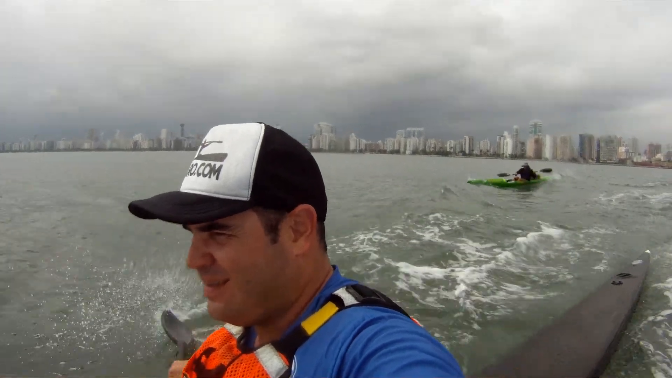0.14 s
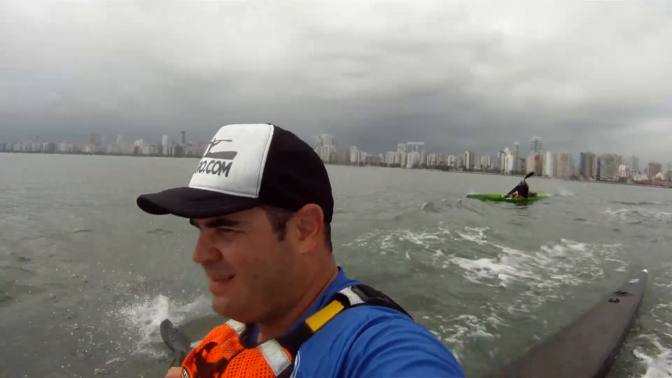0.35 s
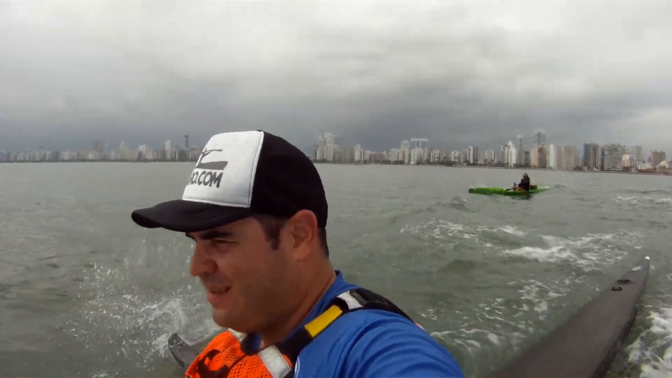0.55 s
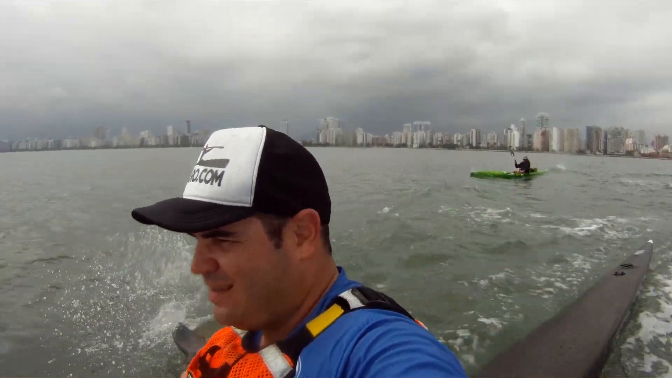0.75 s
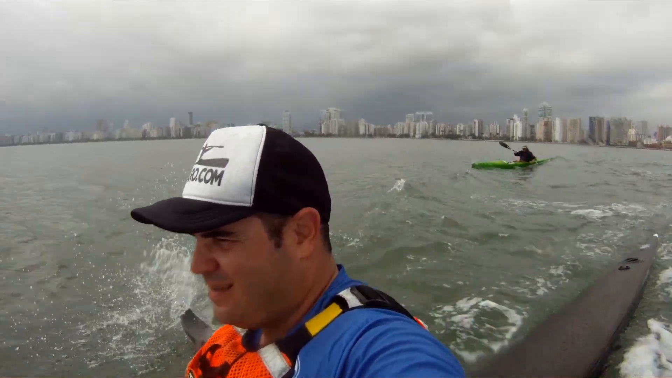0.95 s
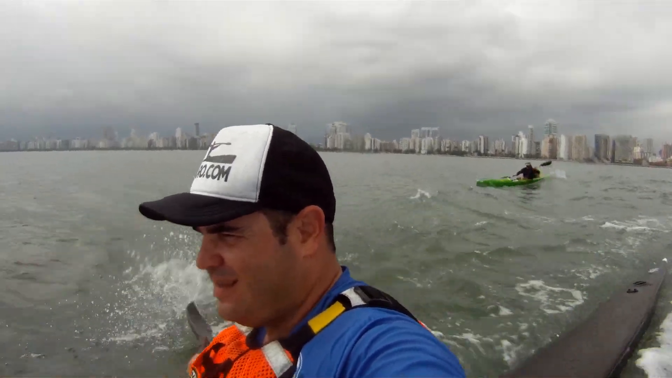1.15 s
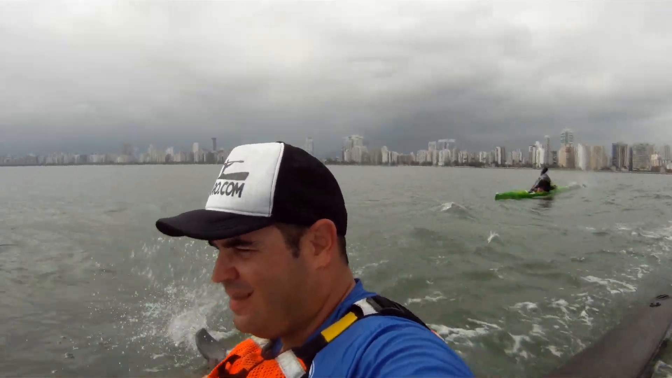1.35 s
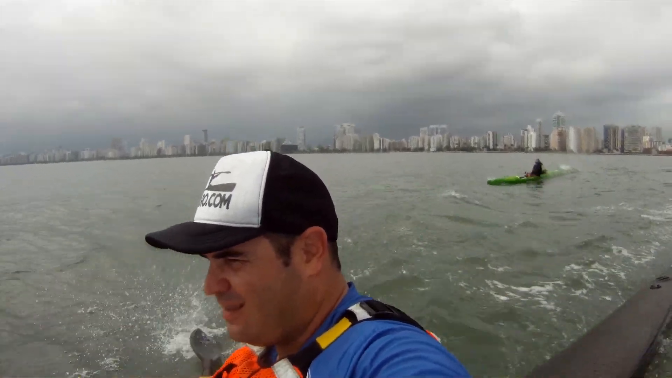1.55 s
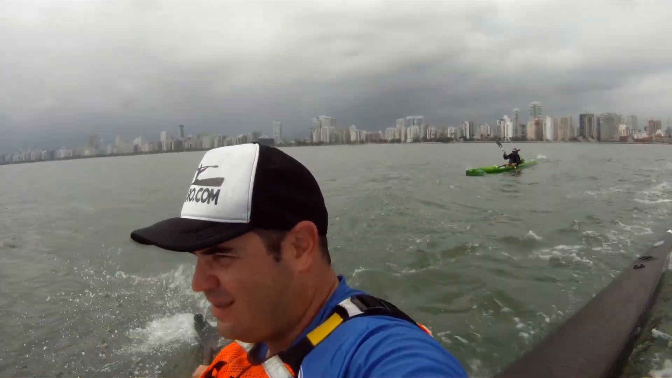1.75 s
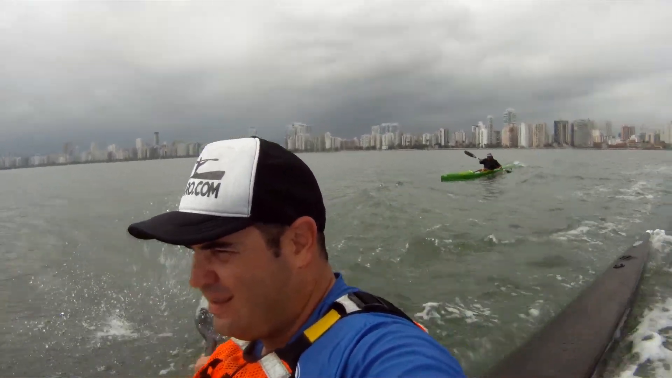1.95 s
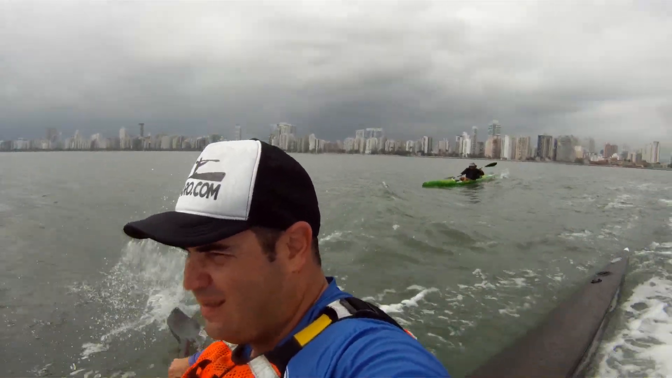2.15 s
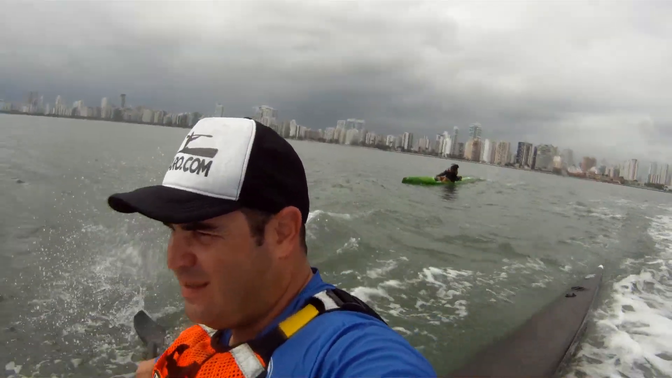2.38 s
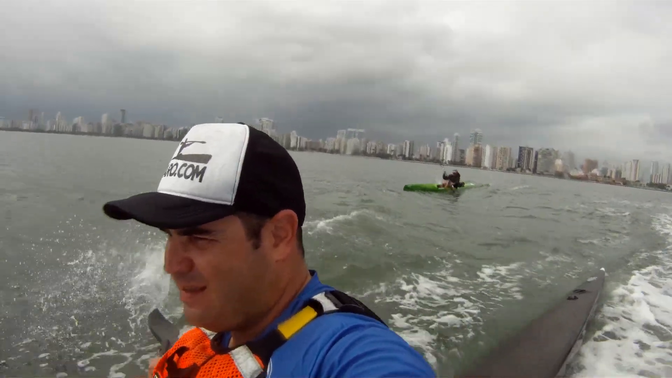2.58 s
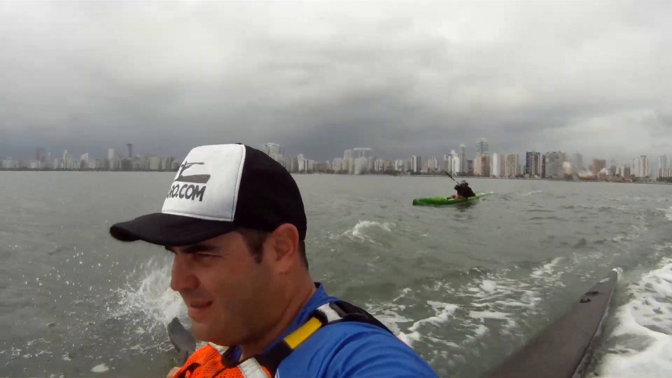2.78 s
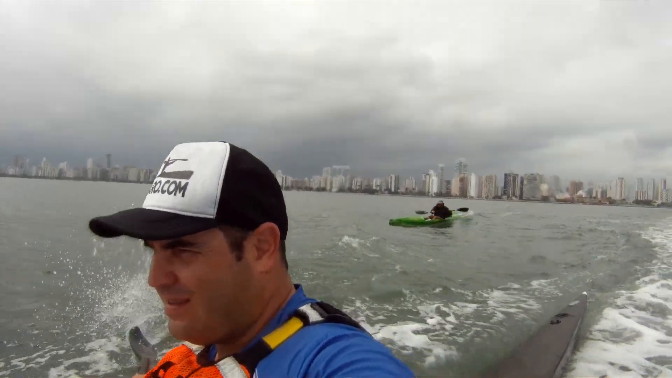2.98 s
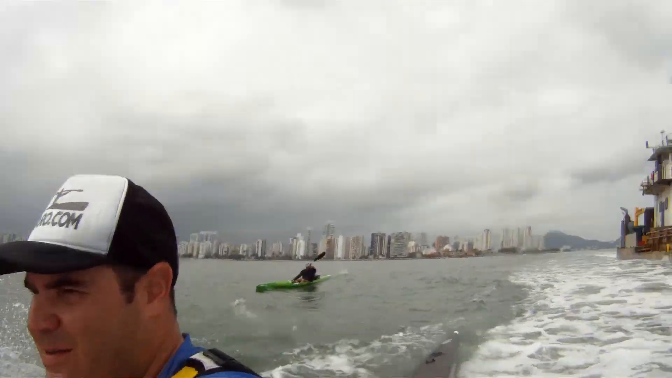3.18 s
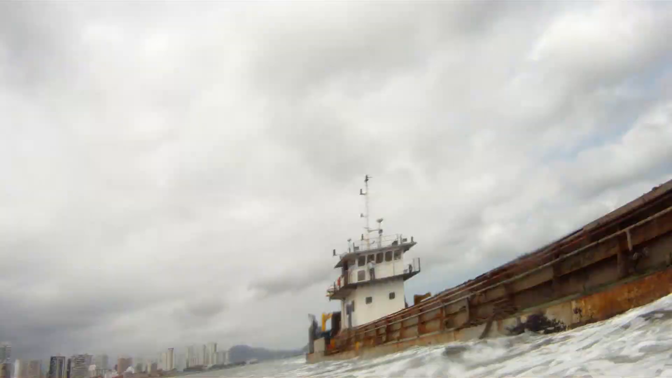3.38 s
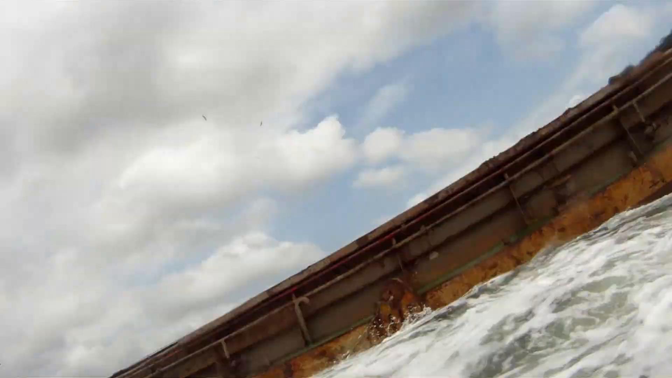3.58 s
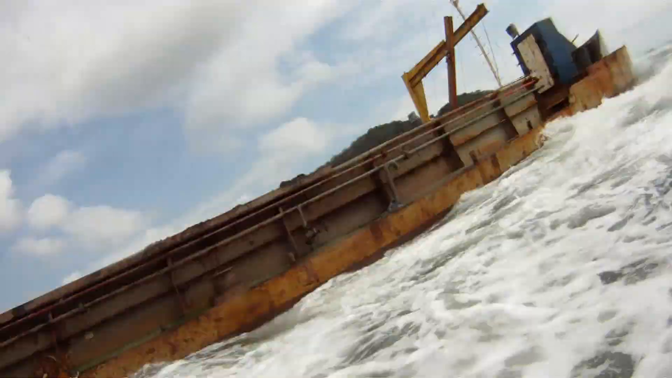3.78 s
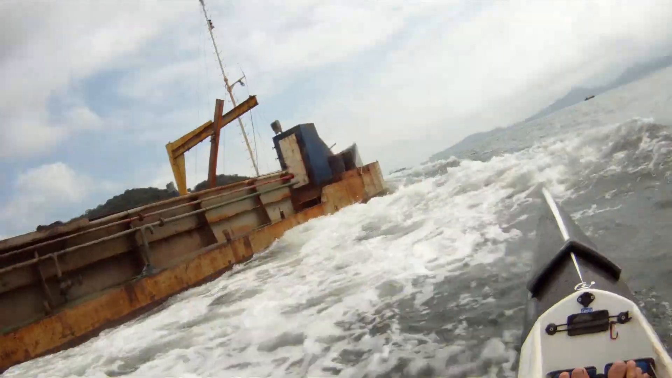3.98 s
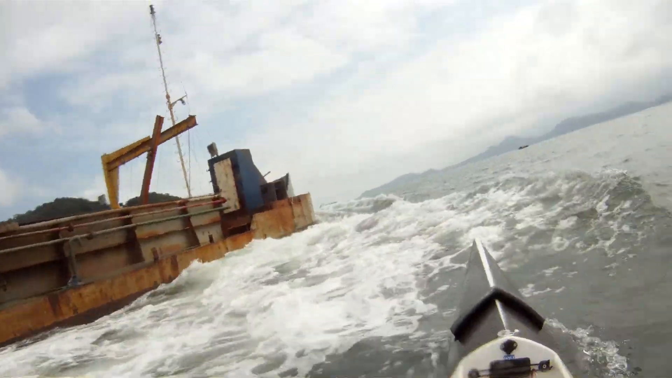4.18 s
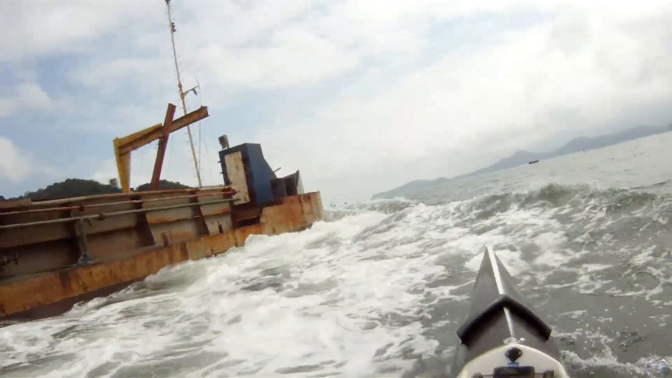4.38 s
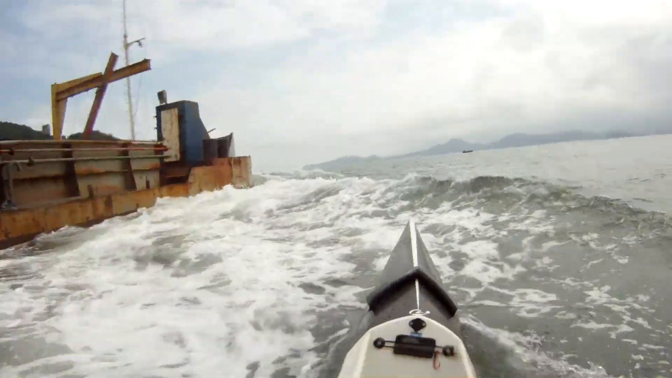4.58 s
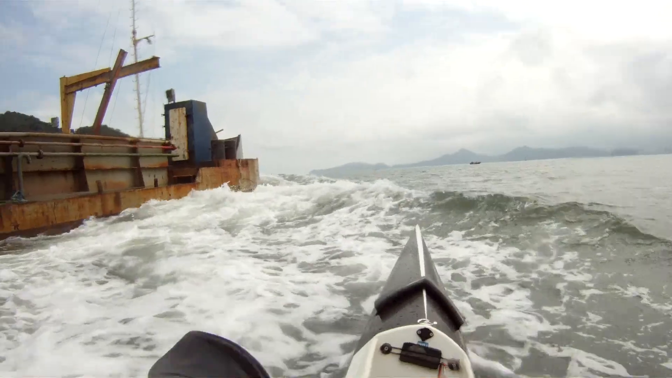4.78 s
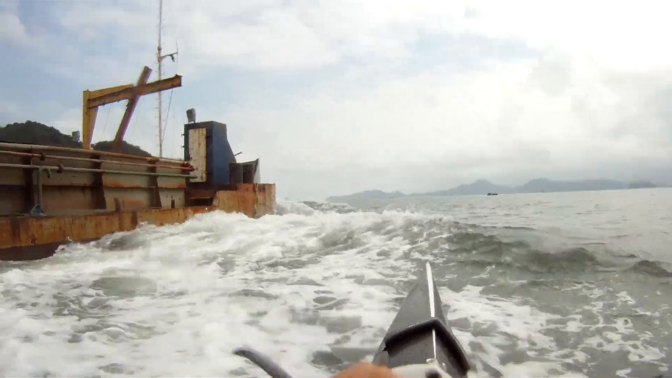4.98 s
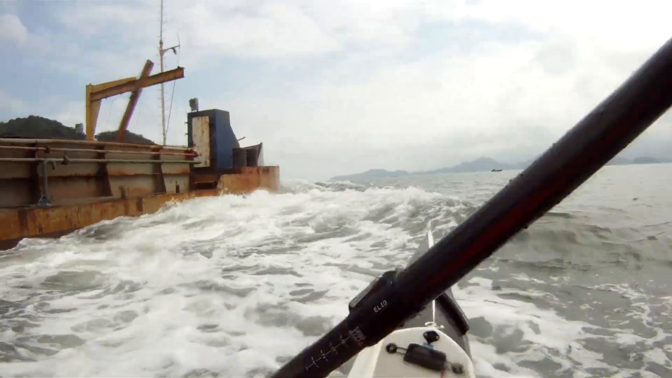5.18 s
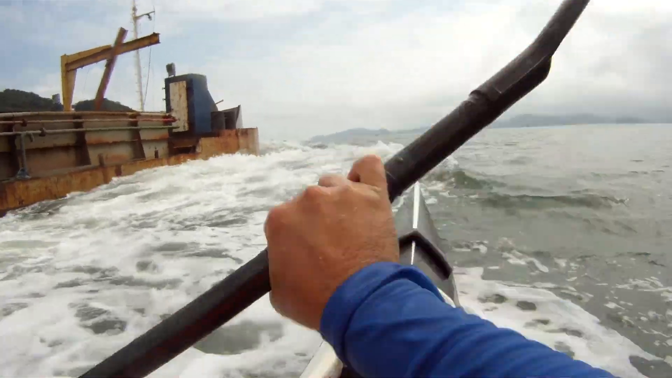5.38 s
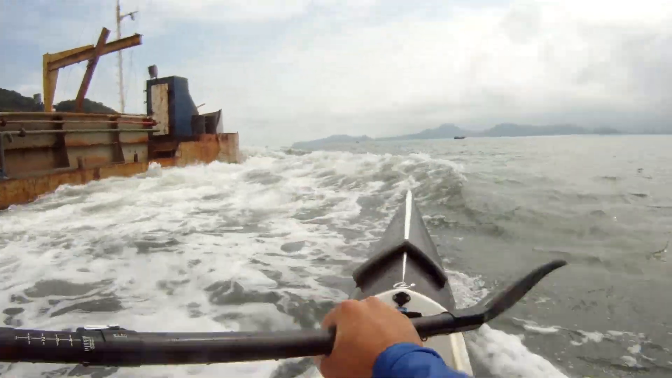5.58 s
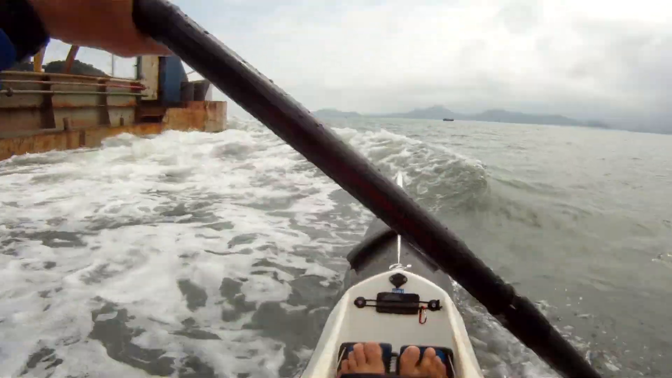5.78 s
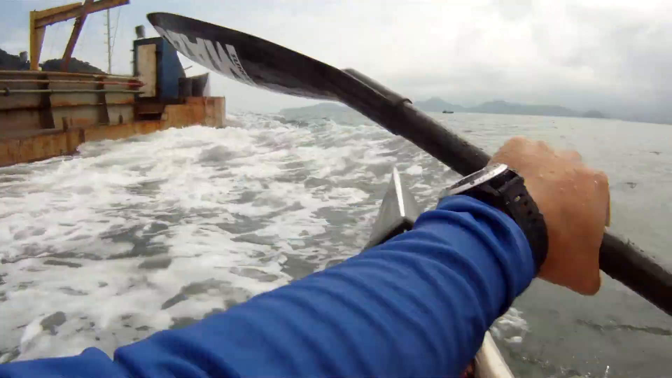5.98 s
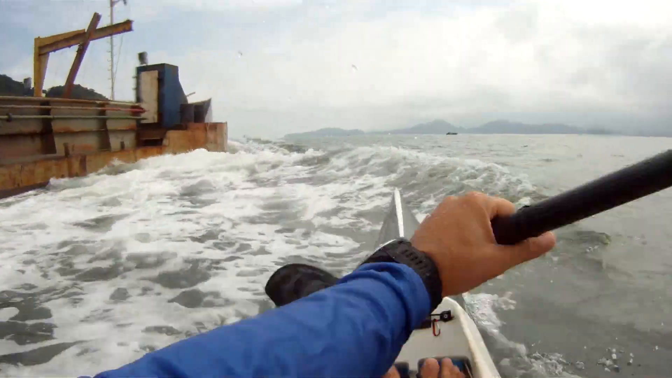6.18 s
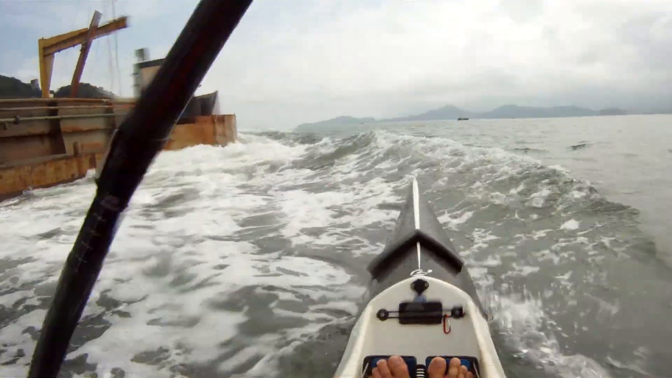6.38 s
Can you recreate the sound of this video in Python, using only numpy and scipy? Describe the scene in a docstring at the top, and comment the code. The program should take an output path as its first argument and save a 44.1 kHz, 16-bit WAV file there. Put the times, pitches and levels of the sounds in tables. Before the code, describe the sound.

Choppy sea washes, bubbles and fizzes steadily past a kayak, heard from inside a waterproof housing. Underneath are a low hull rumble and the hum of a nearby boat engine, which dips briefly around 1.7 seconds. Small paddle splashes and single bubble plops dot the first three seconds. At about 3.3 seconds the wake hisses up and the housing starts turning on its mount: several loud, close knocks, then a short falling squeak at 3.6. From 4 to 4.8 seconds comes a dense run of knocks, wet plastic rubs and dull thumps, with another squeak and low wind buffeting, loudest between 4.2 and 4.5. Faint ticks die away by 5.1 seconds. The water now sounds fuller and lower, with foam swelling over the engine hum. A few splashes, plops and one light knock come shortly before the end at 6.4 seconds.

```python
"""Choppy sea, in a kayak paddled through the foaming wake of a cargo boat whose engine drones nearby.
Chop and wind rumble; bubbles wash and fizz past the hull; drops splash off the blade.
All is heard from inside a waterproof camera housing, which rubs, thumps and knocks as it is swung
on its mount from stern to bow. The water changes colour with the turn."""
import sys
import numpy as np
from scipy import signal
from scipy.fft import rfft, irfft, next_fast_len
from scipy.io import wavfile

SR = 44100
rng = np.random.default_rng(int(sys.argv[2]) if len(sys.argv) > 2 else 0)


def file_out(sig):
    """Save sig as 16-bit WAV at sys.argv[1]."""
    # one column per channel
    cols = np.atleast_2d(sig).T
    # limit, then scale
    lim = np.clip(cols, -1, 1)
    pcm = np.round(lim * 32767).astype(np.int16)
    wavfile.write(sys.argv[1], SR, pcm)


N = 284004
TIME_S = np.arange(N) / SR

# swing of the camera, 0 = stern, 1 = bow: time_s, bow_share
FACING = [(3.3, 0.08), (4.3, 0.68)]
# head wind on the housing: time_s, level_db
WIND_LEVEL = [(0, -63), (2.6, -48), (3.3, -49), (3.7, -35), (4.0, -44), (4.45, -32), (4.75, -42.5),
              (5.3, -41), (6.44, -44)]
# spectra of wind and hull rumble: freq_hz, density_db
WIND_COLOUR = [(8, -7.5), (13, 11), (22, -17), (40, -14), (80, -58), (200, -59)]
HULL_COLOUR = [(12, -23), (25, -13), (45, 9), (70, 1.5), (120, 3.5), (170, -4.5), (240, -12), (400, -14),
               (800, -28)]
# engine firing tone: time_s, level_db
ENGINE_LEVEL = [(0, -39), (0.7, -41.5), (1.7, -54), (2.0, -42.5), (3.15, -38), (5.05, -48), (5.4, -41.5),
                (6.44, -40.5)]
# engine firing rate: time_s, rate_hz
ENGINE_RATE = [(0, 81.17), (3.2, 82.1), (4.0, 80.27), (6.44, 80.4)]
# wake hiss as the camera sweeps past: crest_s, half_length_s, level_db
WAKE_SWELLS = [(3.29, 0.065, -49), (3.58, 0.13, -48.5), (3.93, 0.029, -50), (4.02, 0.022, -42)]
# wake spectrum: freq_hz, density_db
WAKE_COLOUR = [(1500, -10), (2100, -6), (2500, 12.5), (3100, -1.5), (3700, -9), (4700, 3.5), (5800, -5)]
# water spectra facing the stern: freq_hz, density_db
WASH_STERN = [(120, -8), (200, 2), (330, -7.5), (550, -7.5), (760, -0.5), (1000, 5.5), (1200, 1.5),
              (1450, -13.5), (2500, -20)]
SPRAY_STERN = [(250, -6), (600, -19), (1350, -17), (1680, -3.5), (1900, -9.5), (2330, 0.5), (2600, -7),
               (3000, -14.5), (3800, -11.5), (5500, -28)]
FIZZ_STERN = [(2200, 7.5), (2900, -10), (3200, -16), (3600, 6), (4000, -21), (4450, -19), (5100, 0),
              (5600, -2.5), (6000, -17)]
# water spectra facing the bow: freq_hz, density_db
WASH_BOW = [(120, -27), (200, 13), (330, 5), (480, -5), (760, -7.5), (1050, -5), (1400, 1.5), (2500, -5)]
SPRAY_BOW = [(250, -3), (600, -4), (1400, -29), (1750, -4.5), (2200, 2.5), (2500, -2), (3000, -13),
             (3800, -47), (5500, -47)]
FIZZ_BOW = [(2200, -16), (3000, -12), (3500, 2.5), (3800, 2), (4200, 1.5), (4650, -9.5), (5100, -10.5),
            (5600, -13), (6000, -28)]
# waves along the hull, foam patches: crest_s, half_length_s, level_db
WAVE_SWELLS = [(0.2, 0.38, -57.5), (1.03, 0.045, -53), (1.38, 0.34, -52.5), (2.17, 0.18, -50.5),
               (2.82, 0.11, -53), (3.2, 0.26, -54), (4.4, 0.46, -50)]
FOAM_SWELLS = [(0.8, 0.35, -60.5), (1.5, 0.13, -57), (3.45, 0.17, -54), (4.7, 0.21, -62),
               (5.06, 0.19, -52.5), (5.85, 0.074, -52.5), (6.37, 0.1, -50)]
# splashes off blade and bow: start_s, length_s, level_db, pitch_hz
SPLASHES = [(0.443, 0.042, -46, 2450), (0.765, 0.063, -45, 2380), (1.394, 0.024, -41, 2410),
            (1.52, 0.051, -44, 2500), (1.689, 0.012, -35, 2120), (2.046, 0.046, -42.5, 1000),
            (2.153, 0.0031, -36.5, 2380), (3.034, 0.011, -42.5, 2290), (3.372, 0.017, -35, 2320),
            (3.567, 0.015, -33, 2550), (3.654, 0.074, -37.5, 2550), (3.714, 0.046, -38.5, 2280),
            (4.348, 0.012, -37.5, 2520), (4.881, 0.0154, -32, 2150), (4.913, 0.013, -39, 2250),
            (5.116, 0.013, -39.5, 2720), (5.822, 0.072, -48.5, 2200), (6.308, 0.039, -37, 2300),
            (6.367, 0.038, -40.5, 2280)]
# single close bubbles: start_s, peak_db, pitch_hz
PLOPS = [(0.625, -32.5, 2320), (2.257, -36.5, 2390), (5.842, -38.5, 3630), (6.381, -31, 4200)]
# rubs on the housing: start_s, length_s, level_db
RUBS = [(3.669, 0.051, -48), (3.719, 0.053, -35), (4.06, 0.12, -35), (4.212, 0.045, -29.5),
        (4.346, 0.056, -38.5), (4.42, 0.027, -34.5), (4.438, 0.023, -19), (4.452, 0.065, -25),
        (4.718, 0.015, -34.5), (4.748, 0.022, -40), (4.801, 0.04, -36), (4.942, 0.043, -53)]
# rub spectrum: freq_hz, density_db
RUB_COLOUR = [(100, 7), (300, 0), (550, -5.5), (900, 4), (1400, -8.5), (2050, -4), (2500, -10), (3000, -29),
              (3600, -20), (5000, -35)]
# pressure pulses of the flexing housing: centre_s, peak_db, width_ms, edge_ms
THUMPS = [(3.8432, -29, 2.8, 2.2), (4.0208, -22.5, 1.6, 2.6), (4.1143, -15.5, 1.64, 1.8),
          (4.1327, -18, 14, 0.92), (4.246, -22, 5.7, 3.1), (4.441, -11.5, 3, 3.1), (4.4534, -8.5, 2.6, 3.9),
          (4.477, -12.5, 3.9, 0.75), (4.5083, -16, 2.9, 2.6), (4.5615, -21.5, 2.7, 0.15),
          (4.6528, -19.5, 1.35, 0.56), (4.7, -18.5, 1.03, 0.78), (4.8299, -22.5, 3.2, 1)]
# knocks of the mount: start_s, main_db, swell_ms, main_hz, hardness_db
KNOCKS = [ (3.3117, -7, 0.89, 1110, -14.5), (3.3896, -2, 1.02, 1167, -27.5), (3.4474, -2, 1.0, 1148, -20),
          (3.4646, -5.5, 1.6, 1210, -14), (3.483, -5.5, 1.08, 1130, -4), (4.014, -28.5, 0.65, 1000, 16),
          (4.0814, -19.5, 1.5, 915, 21), (4.0852, -19.5, 1.05, 925, 20.5), (4.129, -23, 1.5, 1000, -14),
          (4.2538, 3.5, 1.67, 945, 18.5), (4.2642, -24, 0.91, 1040, 31), (4.287, -34, 0.87, 1090, 18),
          (4.3956, -23.5, 2.6, 800, -11), (4.4127, -10.5, 1.26, 1094, 4.5), (4.4735, -12, 1.26, 1024, -24),
          (4.4883, -12, 0.89, 950, -17), (4.4924, -23, 1.5, 920, 12.5), (4.5086, -6, 1.25, 1123, -13),
          (4.687, -37, 1.96, 1450, 23.5), (4.699, -27, 0.6, 860, 4.5), (4.763, -29.5, 1, 1000, 7),
          (4.772, -28, 0.57, 940, -4), (4.8157, -20.5, 0.85, 1000, 2), (4.943, -33, 1.5, 1120, 11),
          (6.268, -22.5, 0.48, 1110, 13.5)]
# longer slips, gliding down: start_s, main_db, swell_ms, main_hz, hardness_db, sag_share
SQUEAKS = [(3.5874, -5, 3.14, 1200, 6, 0.17), (4.1593, -6, 3.23, 1011, -11.5, 0.4)]
# upper housing modes, raised by hard contact: freq_hz, base_db, db_per_hardness_db
HIGHER_MODES = [(2024, -4.5, 0.427), (2475, -18, 0.45), (3560, -22.5, 1.1632)]
# thud spectrum of the whole case: freq_hz, density_db
THUD_COLOUR = [(50, -8), (110, 6.5), (170, -1.5), (250, -5.5), (330, 1), (450, -32.5), (650, -11),
               (1200, -23)]


def from_db(db):
    """Decibels to gain."""
    return 10 ** (np.asarray(db) / 20)


def unit_rms(x):
    """Scale to rms 1."""
    return x / np.sqrt(np.mean(x ** 2) + 1e-20)


def curve(rows):
    """Breakpoints interpolated to every sample."""
    return np.interp(TIME_S, *np.transpose(rows))


def add(track, start_s, sound):
    """Mix a short sound into a track."""
    start = int(round(start_s * SR))
    track[start:start + len(sound)] += sound[:N - start]


def drift(rate_hz, size=N):
    """Random wander of spread 1, rate_hz new values a second."""
    points = rng.standard_normal(size // 10)
    return np.interp(np.arange(size) * rate_hz / SR, np.arange(len(points)), points) / np.sqrt(2 / 3)


def coloured(x, colour):
    """Filter by a spectrum, rolling off past its ends; rms 1."""
    size = next_fast_len(len(x))
    freq_hz, density_db = np.transpose(colour)
    log_hz = np.log(np.arange(size // 2 + 1) * SR / size + 1)
    beyond = np.abs(log_hz - np.clip(log_hz, np.log(freq_hz[0]), np.log(freq_hz[-1])))
    gain = from_db(np.interp(log_hz, np.log(freq_hz), density_db) - 20 * beyond)
    return unit_rms(irfft(rfft(x, size) * gain, size)[:len(x)])


def grains(per_s, spread_db):
    """Random clicks of unequal size; rms 1."""
    sizes = from_db(spread_db * np.minimum(rng.exponential(1, N), 4)) * rng.choice([-1, 1], N)
    return unit_rms(sizes * (rng.random(N) < per_s / SR))


def burst(length_s):
    """Arched envelope with steep ends."""
    progress = np.linspace(0, 1, max(int(length_s * SR), 8))
    return np.sqrt(np.abs(np.sin(np.pi * progress)))


def swells(rows):
    """Gain of bell-shaped swells, summed in power."""
    bells = (from_db(level_db) * np.exp(-.5 * ((TIME_S - crest_s) / half_s) ** 2)
             for crest_s, half_s, level_db in rows)
    return np.sqrt(sum(bell ** 2 for bell in bells))


def facing_gain(stern_db, bow_db):
    """Gain that follows the camera's turn."""
    return from_db(stern_db + (bow_db - stern_db) * curve(FACING))


def rumble(hull_db, sway_db):
    """Chop drums on the hull; wind buffets the housing."""
    hull = from_db(hull_db + sway_db * drift(3.72)) * coloured(rng.standard_normal(N), HULL_COLOUR)
    wind = from_db(curve(WIND_LEVEL)) * coloured(rng.standard_normal(N), WIND_COLOUR)
    return hull + wind


def engine(octave_db, waver_db):
    """The exhaust's firing tone fades and returns; its weak octave stays."""
    phase = 2 * np.pi * np.cumsum(curve(ENGINE_RATE)) / SR
    octave = from_db(octave_db + 3.7 * drift(8)) * np.sin(2 * phase + .6 * drift(17))
    firing = from_db(curve(ENGINE_LEVEL) + waver_db * drift(17)) * np.sin(phase)
    return np.sqrt(2) * (firing + octave)


def wake():
    """Churned water hisses as tiny bubbles burst."""
    return swells(WAKE_SWELLS) * coloured(grains(per_s=15000, spread_db=8), WAKE_COLOUR)


def bubbles(low_hz, high_hz, per_s, ring_cycles, size_count=14):
    """Bubbles pinch off at random, each dying by 60 dB in ring_cycles; rms 1."""
    clicks = grains(per_s, spread_db=4.5)
    size_index = rng.integers(0, size_count, N)
    out = np.zeros(N)
    for k, pitch_hz in enumerate(np.geomspace(low_hz, high_hz, size_count)):
        step_rad = 2 * np.pi * pitch_hz / SR
        decay = from_db(-60 * pitch_hz / (ring_cycles * SR))
        resonator = [0, np.sin(step_rad)], [1, -2 * decay * np.cos(step_rad), decay ** 2]
        out += np.sqrt(pitch_hz) * signal.lfilter(*resonator, clicks * (size_index == k) + 1e-18)
    return unit_rms(out)


def water(stern_colour, bow_colour, near, near_db, surge_db):
    """Far bubbles merge to a rush, near ones stand out; both surge, coloured by facing; rms 1."""
    bow_share = curve(FACING)
    far = rng.standard_normal(N)
    stern, bow = [coloured(far, colour) + from_db(near_db) * coloured(near, colour)
                  for colour in (stern_colour, bow_colour)]
    rush = (1 - bow_share) * stern + bow_share * bow
    return unit_rms(rush * from_db(surge_db * (drift(16) + drift(90))))


def sea():
    """Large bubbles wash, small ones spray, the finest fizz; waves lift the wash, foam the rest."""
    large = bubbles(478, 1325, per_s=400, ring_cycles=35)
    wash = water(WASH_STERN, WASH_BOW, large, near_db=-6, surge_db=1.37)
    small = bubbles(1430, 2890, per_s=1200, ring_cycles=81)
    spray = water(SPRAY_STERN, SPRAY_BOW, small, near_db=-8, surge_db=1)
    finest = bubbles(3050, 5160, per_s=1600, ring_cycles=38)
    fizz = water(FIZZ_STERN, FIZZ_BOW, finest, near_db=0, surge_db=1.2)
    waves, foam = swells(WAVE_SWELLS), swells(FOAM_SWELLS)
    return (np.hypot(facing_gain(stern_db=-60.5, bow_db=-53), waves) * wash
            + np.hypot(facing_gain(stern_db=-48, bow_db=-53.5), foam) * spray
            + np.hypot(facing_gain(stern_db=-58.5, bow_db=-55.5), foam) * fizz)


def splashes(bandwidth_hz, patter_db, skirt_db):
    """Thrown water: a shower of drops and bubbles ringing round one pitch."""
    out, drops = np.zeros(N), grains(per_s=5000, spread_db=2.5)
    for start_s, length_s, level_db, pitch_hz in SPLASHES:
        envelope = burst(length_s)
        shower = drops[int(start_s * SR):][:SR // 2]
        colour = [(pitch_hz / 4, skirt_db), (pitch_hz, 0), (2 * pitch_hz, skirt_db)]
        patter = coloured(shower, colour)[:len(envelope)]
        ring = signal.lfilter(*signal.iirpeak(pitch_hz, pitch_hz / bandwidth_hz, fs=SR), patter)
        splash = unit_rms(unit_rms(ring) + from_db(patter_db) * patter)
        add(out, start_s, from_db(level_db) * envelope[:len(splash)] * splash)
    return out


def plops(swell_s, rise_share, size=2600):
    """A bubble rings briefly, rising in pitch as it nears the surface."""
    out, age = np.zeros(N), TIME_S[:size] / swell_s
    for start_s, peak_db, pitch_hz in PLOPS:
        phase = 2 * np.pi * pitch_hz * np.cumsum(1 + rise_share * (age - 1)) / SR
        add(out, start_s, from_db(peak_db) * age * np.exp(1 - age) * np.sin(phase))
    return out


def rubs():
    """Wet plastic sticks and slips in dense tiny catches."""
    strokes = np.zeros(N)
    for start_s, length_s, level_db in RUBS:
        add(strokes, start_s, from_db(level_db) * burst(length_s))
    return strokes * coloured(grains(per_s=3500, spread_db=4.5), RUB_COLOUR)


def thumps(lead_s=0.04):
    """The case wall is pressed in and springs back: pressure builds, flips, recovers."""
    out = np.zeros(N)
    time_ms = 1000 * (TIME_S[:int(2 * lead_s * SR)] - lead_s)
    for centre_s, peak_db, width_ms, edge_ms in THUMPS:
        pulse = -np.tanh(time_ms / edge_ms) * np.exp(-np.abs(time_ms / width_ms))
        add(out, centre_s - lead_s, from_db(peak_db) * pulse / pulse.max())
    return out


def settling_ticks(start_s, end_s, gap_s, start_db, fade_db_per_s, swell_ms, main_hz, hardness_db):
    """The mount settles in faint, fading ticks; rows as in KNOCKS."""
    delays_s = gap_s * (np.arange(16) + rng.uniform(0, .5, 16))
    return [(start_s + delay_s, start_db - fade_db_per_s * delay_s, swell_ms, main_hz, hardness_db)
            for delay_s in delays_s if start_s + delay_s < end_s]


def slip(swell_ms, main_hz, hardness_db, sag_share, sharpness, thud_db, size=2600):
    """One slip of the mount: housing modes swell, chatter and sag in pitch as the strain lets go."""
    hollow_hz, hollow_db = 788, -18
    chatter_depth, chatter_hz = 0.39, 1000
    age = TIME_S[:size] / (swell_ms / 1000)
    envelope = (age * np.exp(1 - age)) ** sharpness
    warped_s = np.cumsum(1 + sag_share * (np.exp(-age / 2) - .5)) / SR
    higher = [(mode_hz, base_db + slope * hardness_db) for mode_hz, base_db, slope in HIGHER_MODES]
    modes = np.zeros(size)
    for mode_hz, mode_db in [(hollow_hz, hollow_db), (main_hz, 0)] + higher:
        chatter = 1 + chatter_depth * (drift(chatter_hz, size) + 1j * drift(chatter_hz, size))
        modes += from_db(mode_db) * np.imag(chatter * np.exp(2j * np.pi * mode_hz * warped_s))
    # small stiff walls radiate little below their lowest mode
    ring = signal.sosfilt(signal.butter(2, 520, "high", fs=SR, output="sos"), envelope * modes)
    # the whole case rocks, less on a hard contact
    rocking = 1.37 * coloured(rng.standard_normal(size), THUD_COLOUR)
    thud = rocking * np.sqrt(age / 2 * np.exp(1 - age / 1.3))
    return ring + from_db(thud_db - 0.2868 * hardness_db) * thud


def mount(ticks):
    """The mount turns in slips: long ones squeak, short ones knock or tick."""
    out = np.zeros(N)
    for start_s, main_db, *contact in SQUEAKS:
        add(out, start_s, from_db(main_db) * slip(*contact, sharpness=0.6, thud_db=-26))
    for start_s, main_db, *contact in list(KNOCKS) + ticks:
        knock = slip(*contact, sag_share=0.065, sharpness=0.8, thud_db=-18.5)
        add(out, start_s, from_db(main_db) * knock)
    return out


def scene():
    """Water, engine and wind outside, handling noise on the housing; mono."""
    near_water = splashes(bandwidth_hz=144, patter_db=-4, skirt_db=-7.5)
    near_water += plops(swell_s=0.0018, rise_share=0.0037)
    background = sea() + wake() + engine(octave_db=-60.5, waver_db=1.24) + rumble(hull_db=-50, sway_db=1)
    ticks = settling_ticks(start_s=4.96, end_s=5.095, gap_s=0.019, start_db=-33.5, fade_db_per_s=33,
                           swell_ms=0.71, main_hz=1070, hardness_db=2)
    handling = rubs() + thumps() + mount(ticks)
    return (background + near_water + handling)[None]


def gain_control(x, threshold_db, release_db_per_s, attack_s):
    """Sustained loud sound turns the gain down; it creeps back up."""
    decay = np.exp(-1 / (attack_s * SR))
    power = signal.lfilter([1 - decay], [1, -decay], x ** 2)
    over_db = np.maximum(10 * np.log10(power + 1e-12) - threshold_db, 0)
    ramp_db = release_db_per_s * TIME_S
    return x * from_db(ramp_db - np.maximum.accumulate(over_db + ramp_db, axis=-1))


def record(dry):
    """A slow converter overloads on knocks and holds each sample."""
    hold_hz, cutoff_hz = 12000, 15200
    clipped = np.clip(gain_control(dry, threshold_db=-8, release_db_per_s=73, attack_s=0.015), -1, 1)
    anti_alias = signal.ellip(8, .3, 60, .485 * hold_hz, fs=SR, output="sos")
    # the hold mirrors the spectrum round its rate, under a sinc roll-off
    mirrored = signal.sosfilt(anti_alias, clipped) * (1 + 2 * np.cos(2 * np.pi * hold_hz * TIME_S))
    size = next_fast_len(N)
    roll_off = np.sinc(np.arange(size // 2 + 1) * SR / size / hold_hz)
    held = irfft(rfft(mirrored, size) * roll_off, size)[:, :N]
    return signal.sosfilt(signal.butter(20, cutoff_hz, fs=SR, output="sos"), np.clip(held, -.92, .92))


dry = scene()
out = record(dry)
file_out(out)
```